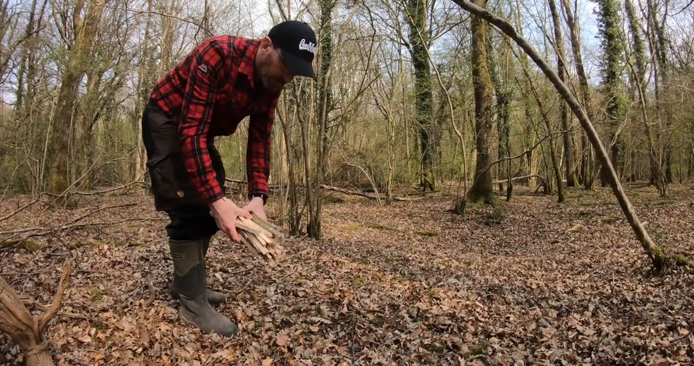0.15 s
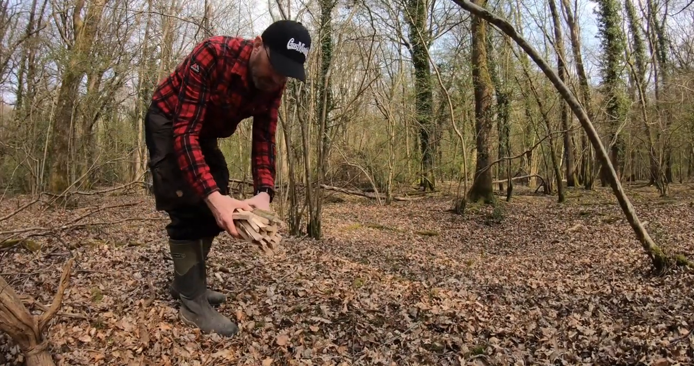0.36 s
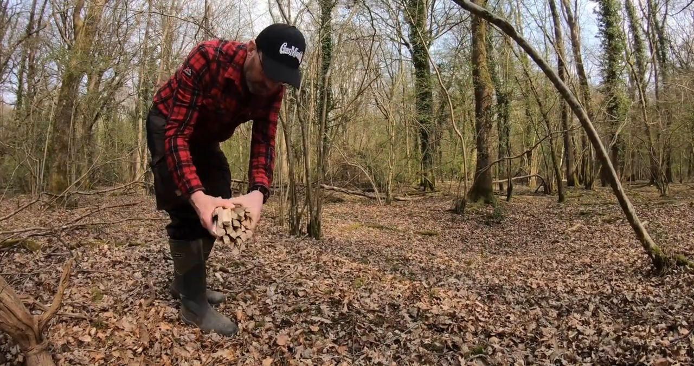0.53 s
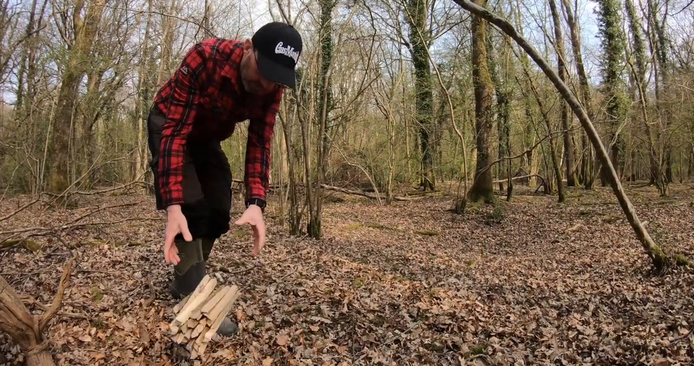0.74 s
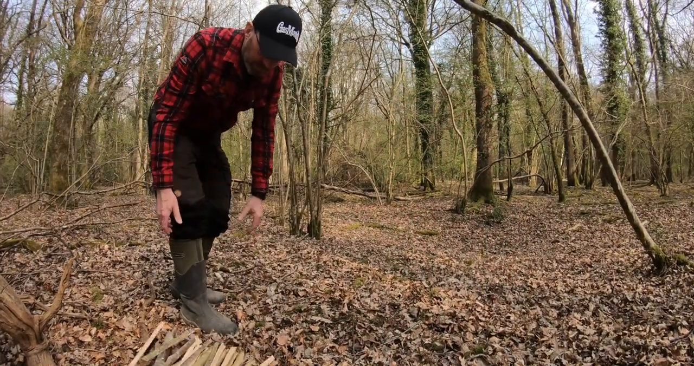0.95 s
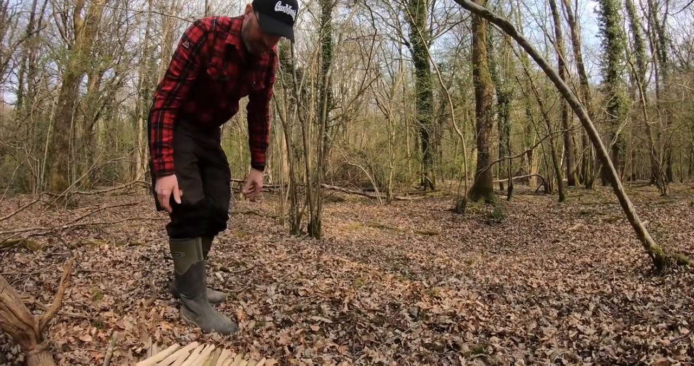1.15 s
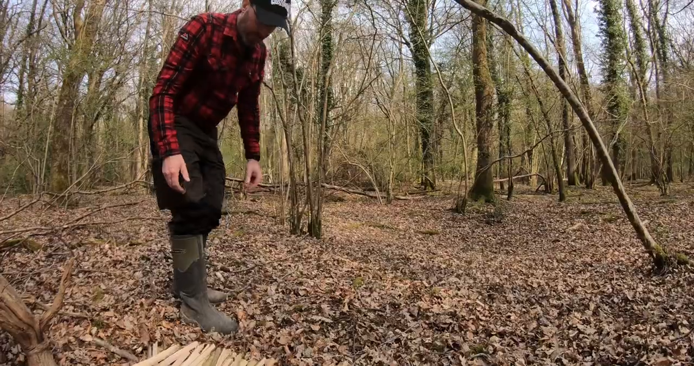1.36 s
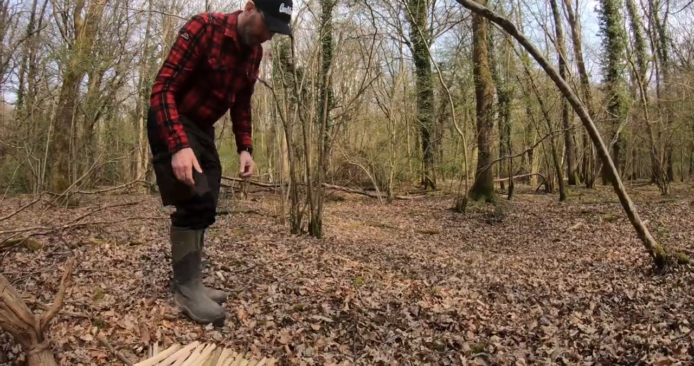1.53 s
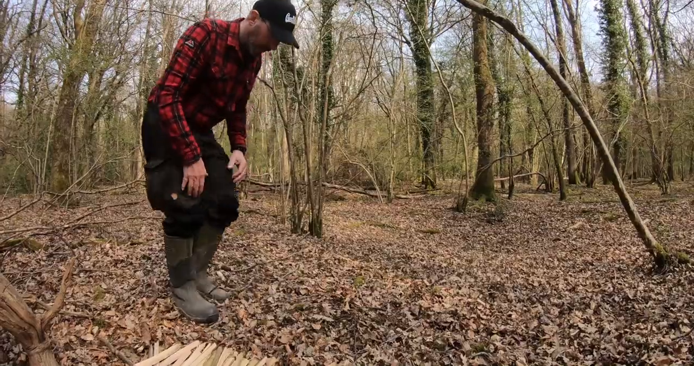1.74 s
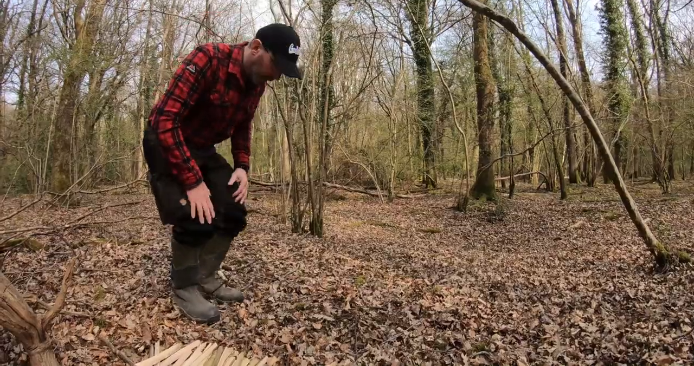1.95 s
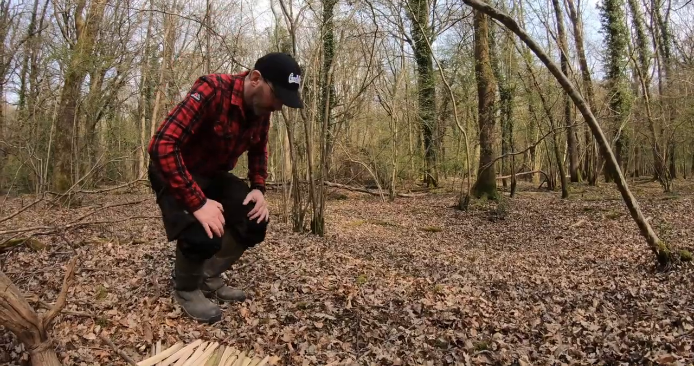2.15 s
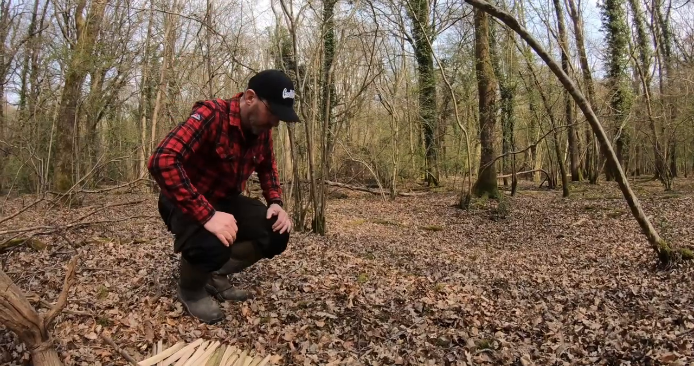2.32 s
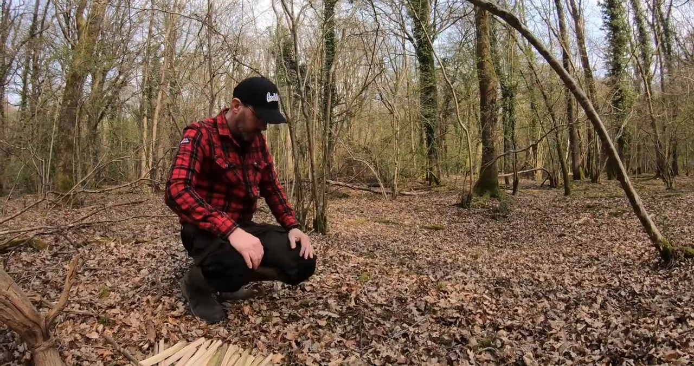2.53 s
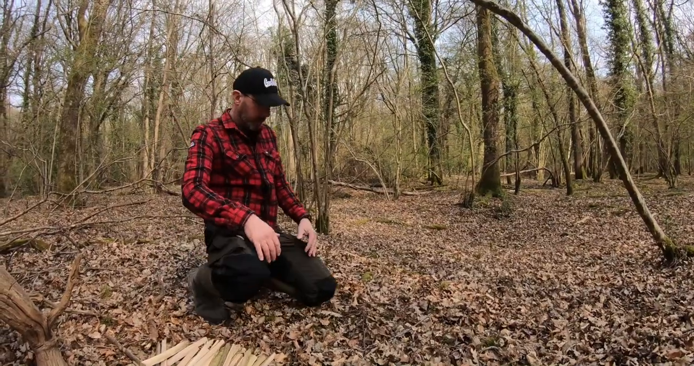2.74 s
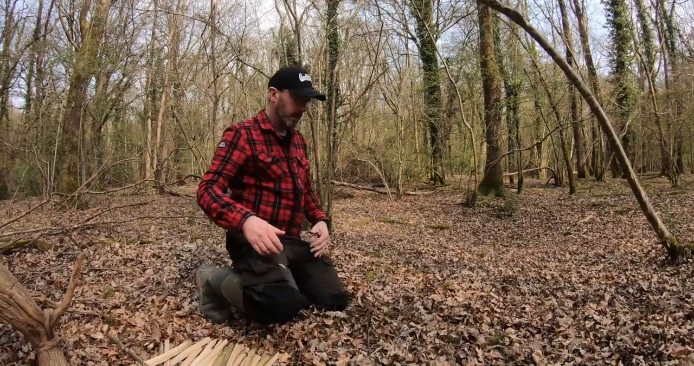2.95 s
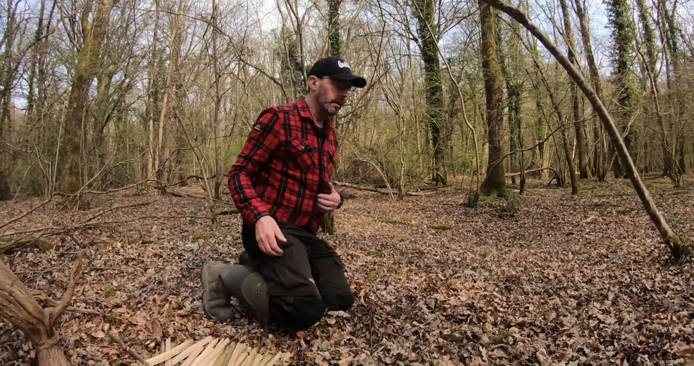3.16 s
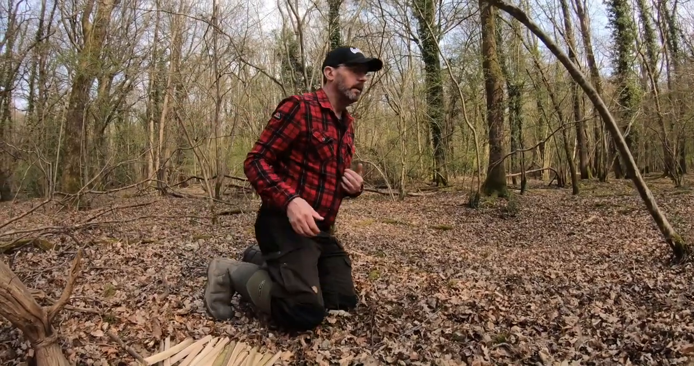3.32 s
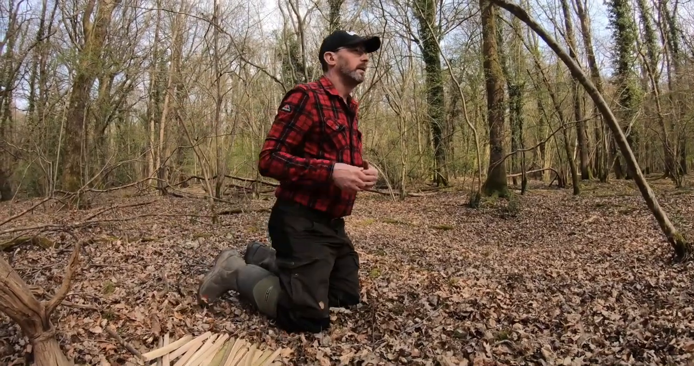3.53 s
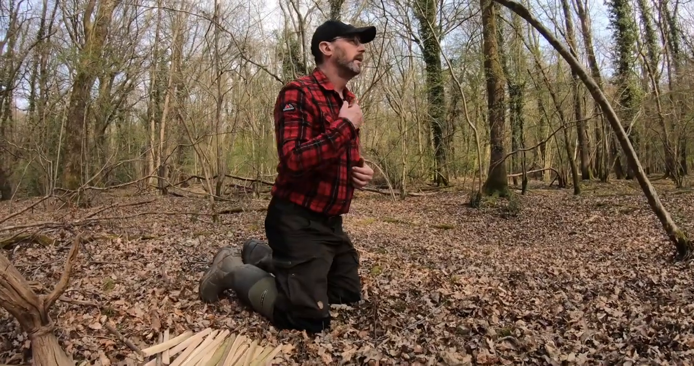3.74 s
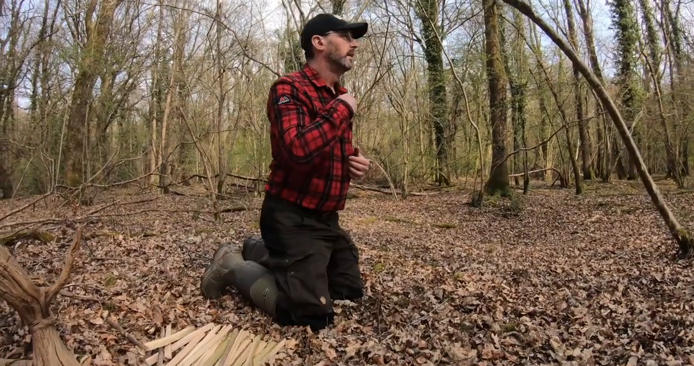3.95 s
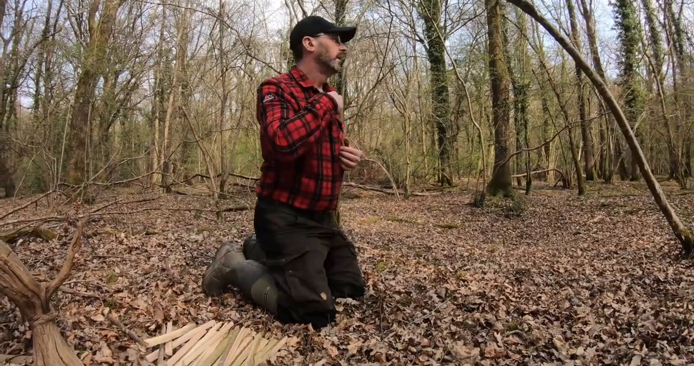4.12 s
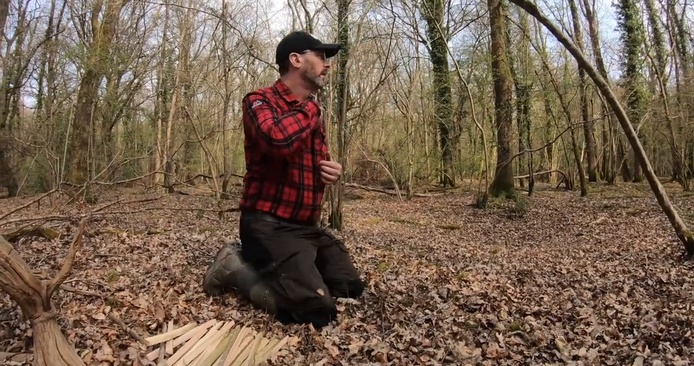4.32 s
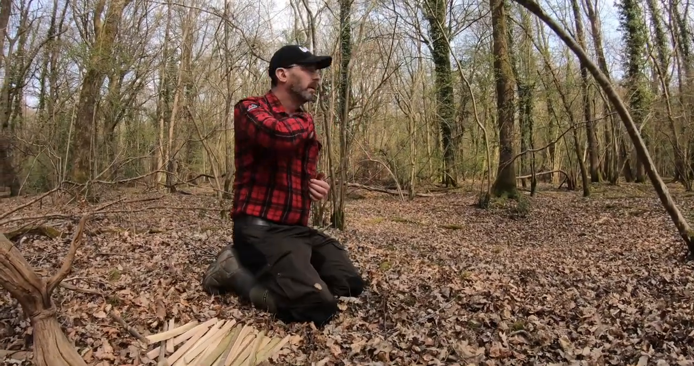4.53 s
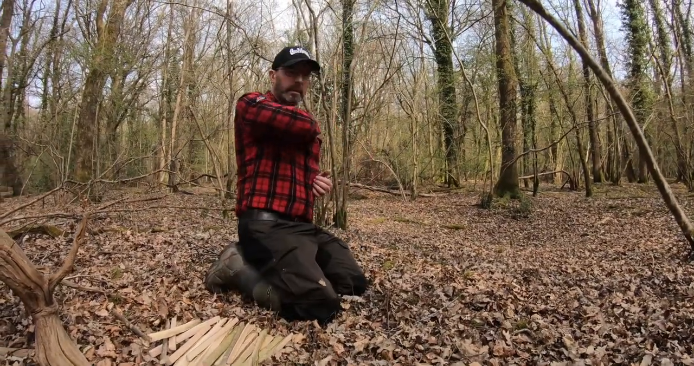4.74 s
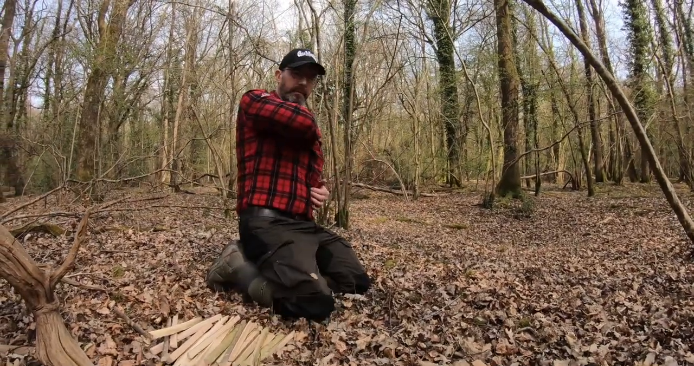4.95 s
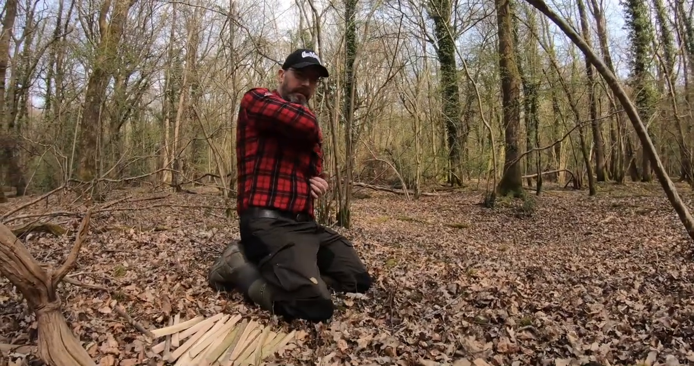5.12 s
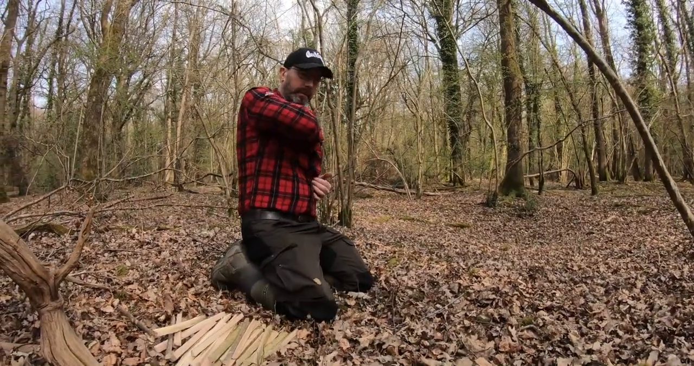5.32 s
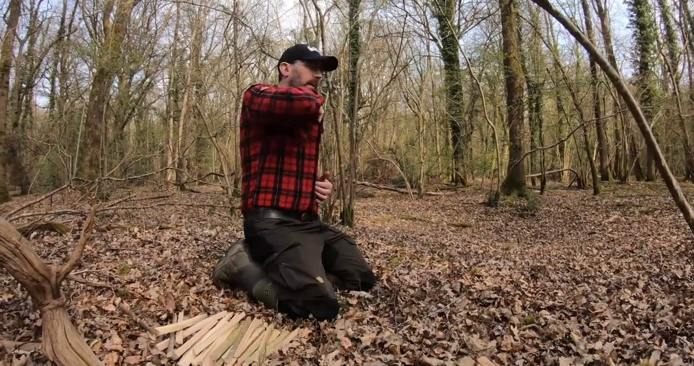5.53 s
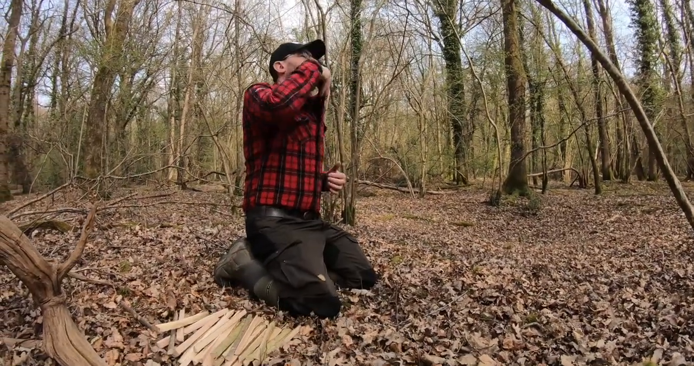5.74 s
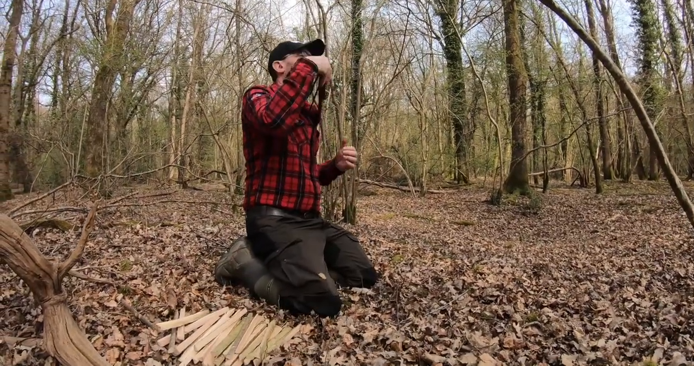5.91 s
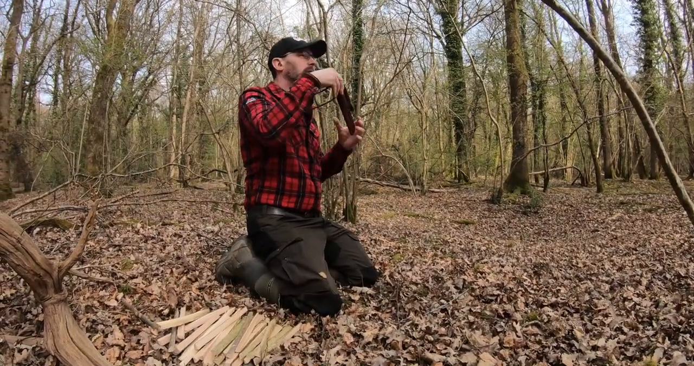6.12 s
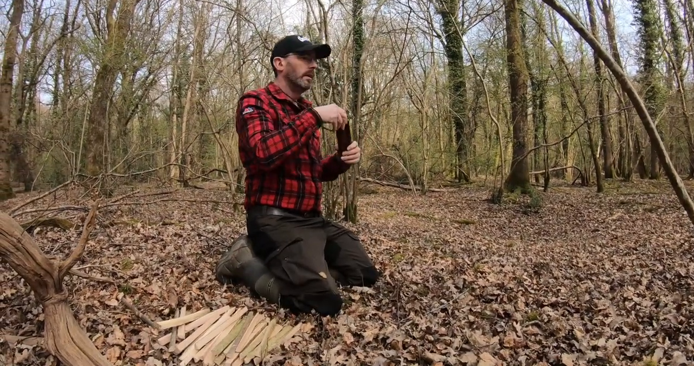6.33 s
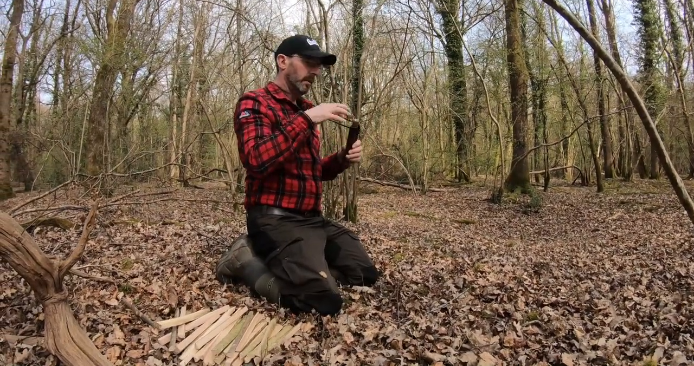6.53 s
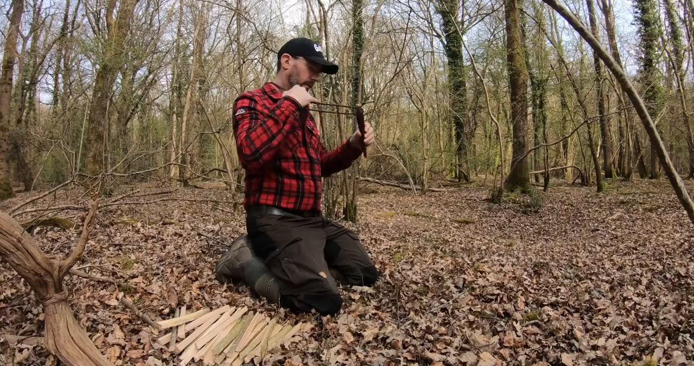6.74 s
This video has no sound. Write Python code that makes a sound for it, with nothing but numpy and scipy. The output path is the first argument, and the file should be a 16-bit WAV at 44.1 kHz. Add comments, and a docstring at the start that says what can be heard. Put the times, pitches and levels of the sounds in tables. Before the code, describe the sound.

A quiet outdoor woodland, heard close in stereo, with low gusts of wind buffeting the microphone and a soft airy wash throughout. At first dry leaves crackle lightly with small twig snaps, and a far bird trills from about 0.3 to 0.8 seconds. Around 0.95 a bundle of split sticks hits the leaves: a sharp, bright wooden clatter with crush and dull thud, rattling and toppling until 1.3. Steps crunch leaves strongly near 1.75, with a loud twig crack at 2.3 and another at 2.55. Kneeling brings brittle rustling around 2.95 and 3.6, rasping trousers, snaps near 3.8 and a last crack and soft thud at 4.5. From 4.8 to 5.3 clothing swishes finely. Then it is quiet: faint bird notes from 5.9, a clear cord tap at 6.35, smaller ticks, and a thin high hiss rising to the end near 6.9.

```python
"""Light wind buffets the microphone throughout: noise rumbling in gusts over a soft airy wash.
First leaves crackle underfoot (bursts of tiny fractures), twigs snap and a far bird trills (gliding sines).
Near 0.9 s a bundle of split sticks drops onto the leaves: ringing wood modes, a crush, rattles, dull thuds.
Someone then steps back, kneels and shuffles: more leaves and snaps, rasping fabric, a swish of clothing.
Late on come small cord taps, far bird notes and the thin rising hiss of cord running through fingers."""
import sys
import numpy as np
from scipy import signal
from scipy.fft import rfft, irfft, next_fast_len
from scipy.io import wavfile
from scipy.ndimage import uniform_filter1d, map_coordinates

SR = 44100
rng = np.random.default_rng(int(sys.argv[2]) if len(sys.argv) > 2 else 0)


def wav_record(signal):
    """Record a signal, one row per channel, as 16-bit PCM in the file named by sys.argv[1]."""
    frames = np.transpose(np.atleast_2d(signal))
    bounded = np.clip(frames, -1, 1)
    # unit amplitude maps onto the largest positive 16-bit level
    quanta = np.round(bounded * 32767).astype(np.int16)
    wavfile.write(sys.argv[1], SR, quanta)


N = 303143
TIME = np.arange(N) / SR
STEPS = TIME[::16]  # coarse times for the slow gains
TICKS_PER_S, TICKS_SPREAD_DB = 60, 2.8  # sparse brittle ticks in leaves and cloth


def amp(db):
    """Turns decibels into gain."""
    return 10 ** (np.asarray(db) / 20)


def unit(x):
    """Scales to rms 1."""
    return x / np.sqrt(np.mean(x ** 2) + 1e-20)


def colour(x, points):
    """Filters by a spectrum of (f/Hz, gain/dB) points, joined along log frequency."""
    size = next_fast_len(N + 4096)
    hz, db = np.transpose(points)
    log_hz = np.log(np.fft.rfftfreq(size, 1 / SR) + 1)
    gain = amp(np.interp(log_hz, np.log(hz + 1), db))
    return irfft(rfft(x, size) * gain, size)[..., :N]


def add(mix, s, sound):
    """Mixes a sound in at time s."""
    part = mix[max(round(s * SR), 0):][:len(sound)]
    part += sound[:len(part)]


def dying(t60, size=8192):
    """An exponential decay that falls 60 dB in t60 seconds."""
    return np.exp(-np.log(1000) * TIME[:size] / t60)


def band(x, hz, octaves):
    """A broad band-pass reaching the given octaves either side of hz."""
    edges = np.clip([hz / 2 ** octaves, hz * 2 ** octaves], 10, SR / 2 - 100)
    return signal.sosfilt(signal.butter(1, edges, "band", fs=SR, output="sos"), x)


def random_sizes(spread_db):
    """Signed sizes, exponentially spread in dB: a positive spread makes a few large, a negative a few small."""
    return amp(spread_db * np.minimum(rng.exponential(1, N), 4)) * rng.choice([-1, 1], N)


def clicks(per_s, spread_db):
    """Sparse impulses at random times and sizes."""
    return random_sizes(spread_db) * (rng.random(N) < per_s / SR)


def fractures(per_s, spread_db, t60, count=24):
    """Tiny fractures, each ringing one of a few scraps of material; per_s may follow a curve."""
    at = np.flatnonzero(rng.random(N) < per_s / SR)
    size = random_sizes(spread_db)[at]
    scraps = []
    for hz in np.geomspace(1000, 11000, count):
        burst = rng.standard_normal(384) * dying(t60, size=384)
        scraps.append(unit(band(burst, hz, .6)) * np.sqrt(hz))
    scraps = np.array(scraps)
    which = rng.integers(0, count, N)[at]
    # lay every scrap down at its own moment and sum the overlaps
    places = at[:, None] + np.arange(scraps.shape[1])
    grains = size[:, None] * scraps[which]
    return np.bincount(places.ravel(), grains.ravel(), N)[:N]


def steady(x, size=2205):
    """Holds the slow level near rms 1 over a window of size samples and keeps the grain."""
    return x / np.sqrt(abs(uniform_filter1d(x ** 2, size)) + 1e-9)


def crackle(spectrum, per_s, spread_db, t60, rub, size=4410):
    """Fractures over smooth rubbing noise, at an even slow level."""
    grains = steady(fractures(per_s, spread_db, t60), size=size)
    return steady(colour(grains + rub * rng.standard_normal(N), spectrum), size=size)


def swell(s, db, rise_s, fall_s, hold_s=0):
    """Gain of one movement: 20 dB per rise or fall time, level during the hold."""
    below = np.maximum(s - STEPS, 0) / rise_s + np.maximum(STEPS - s - hold_s, 0) / fall_s
    return amp(db - 20 * np.minimum(below, 10))


def swells(rows):
    """Gain of overlapping movements, summed in power."""
    power = sum(swell(*row) ** 2 for row in rows)
    return np.interp(TIME, STEPS, np.sqrt(power))


def weather(shared=0.8):
    """Turbulent gusts rumble partly independently at each port, over the soft wash of the wood."""
    # gusts reaching the microphone: [fullest from t/s, relative level/dB, hold/s]
    gusts = [(0.023, -45, 0.13), (0.306, -53, 0.32), (.78, -52, 0.12), (1.422, -49.5, 0.034),
             (1.704, -55.5, .12), (2.968, -50, .43), (4.112, -59, 0.0086), (4.4, -52, 0.046),
             (4.8, -48, 0.014), (5.43, -49.5, 0.14), (5.718, -47, 0.21), (6.2, -49, .03),
             (6.4, -50.5, 0.23), (6.78, -45, 0.1)]
    # low rumble of moving air at the ports: [f/Hz, gain/dB]
    wind_colour = [(8.8, -25), (15, -3), (37, -0.5), (65, -1), (135, -15), (166, -15.5), (231, -34),
                   (304, -30), (400, -31), (520, -63), (880, -120)]
    # soft wash of the wood: [f/Hz, gain/dB]
    wash_colour = [(100, 9), (250, 4.5), (470, -11.5), (800, -0.5), (1200, -12.5), (2200, -14), (3500, -11),
                   (6000, -19), (10000, -28), (15000, -42)]
    rise_s, fall_s, breeze_db = .12, 0.24, -63.5  # the light breeze carries on between gusts
    rumble = colour(rng.standard_normal((2, N)) + shared * rng.standard_normal(N), wind_colour)
    wash = colour(rng.standard_normal((2, N)) + 0.72 * rng.standard_normal(N), wash_colour)
    gusting = swells([(s, db, rise_s, fall_s, hold) for s, db, hold in gusts])
    wind = np.hypot(amp(breeze_db), gusting)
    return amp(-1.5) * wind * steady(rumble, size=8820) + amp(-62) * unit(wash)


def leaves(busy_per_s=3500, busy_db=-40, crowding=.75):
    """Harder stirring breaks more leaves at once; the pressed layer beneath crunches lower."""
    # pushes by feet, tumbling sticks and knees:
    # [fullest at t/s, relative level/dB, rise/s, fall/s, low crunch relative to the stir/dB]
    pushes = [(.06, -52, 0.61, 0.27, -9.5), (.66, -64.5, 0.38, 0.37, -5.5), (.98, -40, 0.031, 0.27, -15.5),
              (1.149, -36.5, .13, 0.14, -20), (1.26, -40, 0.12, 0.074, -15.5), (1.6, -46, 0.4, 0.3, -10.5),
              (1.745, -37, 0.19, 0.06, -6.5), (1.87, -50, 0.14, 0.17, -4.5), (2.009, -46.5, 0.21, 0.2, -9),
              (2.33, -52, 0.28, 0.36, -7.5), (2.74, -51.5, 1, 0.58, -9.5), (2.958, -42.5, .08, .32, -13.5),
              (3.28, -51, 1, 1.1, -14.5), (3.59, -37.5, .22, 0.28, -13.5), (3.728, -42.5, 0.19, 0.13, -9.5),
              (3.85, -51, 0.37, 0.94, -9), (4.55, -48.5, 0.55, 0.2, -5.5)]
    # crackle of dry leaves: [f/Hz, gain/dB]
    leaf_colour = [(100, -54.5), (400, -13), (750, -3.5), (1100, -2.5), (1500, -2), (2100, -2.5),
                   (3000, -1), (4200, -1.5), (5500, -8), (7000, -12), (10000, -28.5)]
    # fine fizz above the crackle: [f/Hz, gain/dB]
    fizz_colour = [(1000, -61), (3500, -22.5), (5500, -2.5), (6300, -4.5), (7900, -10.5), (9100, -3.5),
                   (10000, -5), (11000, -11), (13500, -8), (15000, -24)]
    # low crunch of the pressed layer: [f/Hz, gain/dB]
    crunch_colour = [(30, -40.5), (90, -13), (160, -1), (280, 9), (480, -4), (780, -8), (1100, -24.5),
                     (2000, -29.5)]
    fizz_db, fizz_follows = -5.5, 1  # fizz against crackle in a busy push; dB gained per dB of crackle
    stir = swells([row[:4] for row in pushes])
    weight = swells([(s, db + low_db, rise, fall) for s, db, rise, fall, low_db in pushes])
    busy = stir / amp(busy_db)
    per_s = busy_per_s * busy ** crowding
    top = crackle(leaf_colour, per_s=per_s, spread_db=3.8, t60=0.0093, rub=1.0)
    fizz = crackle(fizz_colour, per_s=per_s, spread_db=-2.5, t60=0.0088, rub=1.0)
    # now and then a whole brittle leaf gives way, standing out most when the rest is quiet
    ticks = fractures(TICKS_PER_S, TICKS_SPREAD_DB, t60=0.011)
    exposed = amp(-8.5) / (1 + busy)
    top = top + exposed * unit(colour(ticks, leaf_colour))
    fizz = fizz + exposed * unit(colour(ticks, fizz_colour))
    under = steady(colour(clicks(per_s=1300, spread_db=5.0), crunch_colour))
    fizz_gain = amp(busy_db + fizz_db) * busy ** fizz_follows
    return amp(-0.3) * (stir * top + fizz_gain * fizz) + amp(1.54) * weight * under


def bounce(x):
    """The direct sound and its slightly later reflection off the ground comb against each other."""
    # lag of the reflection as the body moves: [t/s, lag/s]
    ground_lag = [(0, .0014), (1.75, .0014), (2.6, .00146), (3.8, .00146), (4.9, .00167), (6.87, .00167)]
    # what the leaf litter reflects: [f/Hz, gain/dB]
    litter = [(2200, -9.5), (3500, -15), (6000, -24)]
    lag = np.interp(TIME, *np.transpose(ground_lag))
    late = map_coordinates(x, [np.arange(N) - lag * SR], order=3)
    return 0.9 * (x + colour(late, litter))


def cracks(rows, octaves, first):
    """A sudden release (one strong first sample) and a noise burst that dies in milliseconds."""
    out = np.zeros(N)
    for s, db, hz, t60 in rows:
        burst = rng.standard_normal(8192) * dying(t60)
        burst[0] += first
        burst = band(band(burst, hz, octaves), hz, octaves)
        add(out, s, amp(db) * burst / abs(burst).max())
    return out


def snaps():
    """Twigs and leaf stalks break, releasing their tension in short splintering bursts."""
    # breaks: [t/s, peak level/dB, centre f/Hz, t60/s]
    breaks = [(.053, -29.5, 796, 0.016), (.088, -34.5, 3020, 0.017), (.206, -37.5, 3500, 0.036),
              (.334, -41.5, 5160, 0.0082), (.524, -44, 4430, 0.017), (1.726, -35, 3530, 0.0079),
              (1.75, -40, 1800, .015), (1.8705, -27, 2500, 0.012), (1.896, -37.5, 900, 0.015),
              (1.9705, -28, 1360, 0.015), (2.029, -33, 570, 0.042), (2.338, -16.5, 1810, 0.014),
              (2.5575, -22, 2540, 0.014), (2.8145, -35, 2300, 0.021), (2.921, -28.5, 3960, 0.036),
              (2.951, -27, 2960, 0.059), (3.8015, -25.5, 2600, 0.023), (3.818, -25.5, 3200, 0.01),
              (3.8315, -25.5, 1610, 0.013), (3.853, -29.5, 3200, 0.0077), (3.9465, -33, 1260, 0.0082),
              (3.967, -35, 3000, .014), (4.315, -40.5, 2560, 0.023), (4.394, -39.5, 586, 0.034),
              (4.4775, -22.5, 3220, 0.029)]
    return cracks(breaks, octaves=1.12, first=5.2)


def trees(x, t60):
    """Sparse random echoes from trunks, different for each ear."""
    echoes = rng.standard_normal((2, SR)) * (rng.random((2, SR)) < 1500 / SR) * dying(t60, size=SR)
    echoes[:, :400] = 0  # no echo in the first 9 ms
    return signal.fftconvolve(x[None], echoes / np.linalg.norm(echoes[0]), axes=1)[:, :N]


def whistle(length, start_hz, end_hz, waver):
    """One gliding bird note of rms 1: a sine whose pitch eases to its end and wavers."""
    u = np.linspace(0, 1, int(length * SR))
    drift = unit(uniform_filter1d(rng.standard_normal(SR), size=90))[:len(u)]
    hz = (start_hz + (end_hz - start_hz) * np.sin(np.pi / 2 * u)) * (1 + waver * drift)
    return unit(np.sin(np.pi * u) * np.sin(2 * np.pi * np.cumsum(hz) / SR))


def birds():
    """A trill, then single whistled notes; the larger a note's echo share, the more the trees smear it."""
    # far trill: first note t/s, end t/s, notes per second
    trill_times = (.27, .78, 15)
    # single notes: [t/s, length/s, level/dB, start f/Hz, end f/Hz, share of echo 0-1]
    notes = [(0.887, 0.059, -55, 3750, 4040, 0.8), (1.365, 0.075, -57, 3900, 3810, 0.8),
             (1.478, 0.053, -57, 4000, 3960, 0.4), (5.936, 0.088, -73, 6730, 6060, 0.97),
             (6.028, 0.16, -74.5, 3260, 3155, 0.85), (6.187, 0.11, -78.5, 4630, 4620, 0.6),
             (6.199, 0.079, -69, 1150, 1335, 0.98), (6.408, 0.16, -69, 3080, 3460, 0.85),
             (6.522, 0.11, -73.5, 3240, 3150, 0.7), (6.636, 0.17, -74, 4630, 4610, 0.9)]
    trill_db, trill_hz = -66.5, (2900, 4400)  # each trill note glides up, before random offsets
    direct, trill, far = np.zeros((3, N))
    first, end, per_s = trill_times
    for s in np.arange(first, end, 1 / per_s):
        late, louder, higher = rng.standard_normal(3) * [.006, 1, .03]  # s, dB, share of pitch
        note = whistle(.05, *np.multiply(trill_hz, 1 + higher), waver=.05)
        add(trill, s + late, amp(trill_db + louder) * note)
    for s, length, db, start_hz, end_hz, echo in notes:
        note = amp(db) * whistle(length, start_hz, end_hz, waver=0.0022 + .012 * echo ** 8)
        add(direct, s, np.sqrt(1 - echo ** 2) * note)
        add(far, s, echo * note)
    return direct + .3 * trill + trees(trill, t60=.25) + trees(far, t60=.55)


def knock(hz):
    """One blow on a stick: the wood modes near hz ring along with a short contact crack."""
    # modes of the sticks: [f/Hz, level/dB, t60/s]
    wood_modes = [(724, -8, 0.036), (975, -9.5, 0.037), (1212, -14.5, 0.11), (1342, -12, 0.08),
                  (1566, -5, 0.053), (2225, 1, .05), (2425, -9.5, 0.11), (2620, -14.5, 0.05),
                  (2960, -10, 0.031), (3170, -0.5, .038), (3300, -10, .04), (3550, -14, .05),
                  (3510, -9, .05), (4120, -6.5, 0.026), (4770, -11, .05), (4880, -12, 0.043),
                  (5050, -7.5, 0.034), (5500, -12.5, .04), (6550, -20, .04)]
    reach_octaves, crack_strength, crack_t60 = .36, .65, .011  # crack is relative to the ring
    ring = 0
    for f, db, t60 in wood_modes:
        weight = amp(db) / (1 + (np.log2(f / hz) / reach_octaves) ** 4)
        ring = ring + weight * dying(t60) * np.sin(2 * np.pi * (f * TIME[:8192] + rng.random()))
    contact = band(rng.standard_normal(8192) * dying(crack_t60), hz, 0.53)
    blow = ring / abs(ring).max() + crack_strength * contact / abs(contact).max()
    blow = blow * (1 - dying(0.00059))  # softens the onset
    return blow / abs(blow).max()


def sticks():
    """The bundle crushes the leaves, its sticks collide, and the pile rattles as it lands and topples."""
    # leaves crushed under the bundle: [f/Hz, gain/dB]
    crush_colour = [(40, -54.5), (100, -18.5), (300, -10.5), (480, -8.5), (800, 0.5), (1100, -2),
                    (1500, -2.5), (1800, -1), (3700, 3), (4400, 3.5), (6200, -2.5), (8300, -15), (9600, -7),
                    (15000, -28)]
    # stick on stick: [t/s, peak level/dB, pitch that rings most f/Hz]
    knocks = [(.9435, -16.5, 4920), (.9492, -11, 3300), (.9538, -6.5, 3020), (.958, -14.5, 2270),
              (.9805, -28.5, 4160), (1.005, -28, 1635), (1.032, -43, 2560), (1.0608, -32.5, 1336),
              (1.0635, -32.5, 2205), (1.088, -35, 2330), (1.1107, -21, 1710), (1.117, -29.5, 4540),
              (1.1365, -33, 1660), (1.147, -35.5, 864), (1.151, -22, 2860), (1.1554, -26, 1610),
              (1.1678, -26.5, 1230), (1.184, -31, 2140), (1.196, -29, 1000), (1.226, -36.5, 890),
              (1.252, -41, 1413), (1.275, -33, 4900)]
    # rattle of the pile landing, then toppling: [fullest at t/s, level/dB, rise/s, fall/s, hold/s]
    settle = [(.957, -31, .03, .035, .003), (1.13, -39.5, 0.39, .12, .07)]
    landing_s = .92  # no rattle before this
    # crush: fullest at s, level dB, rise s, fall s, hold s
    crush_gain = swells([(.941, -21, .017, 0.018, 0.014)])
    out = crush_gain * crackle(crush_colour, per_s=11000, spread_db=-1.5, t60=.003, rub=0.82, size=441)
    for s, db, hz in knocks:
        add(out, s, amp(db) * knock(hz))
    rattle = np.zeros(N)
    for hz in np.geomspace(900, 5500, 8):
        hits = clicks(per_s=30, spread_db=1.5)
        rattle += signal.oaconvolve(hits, unit(knock(hz)))[:N] * hz ** -.25
    return out + (TIME > landing_s) * swells(settle) * steady(rattle)


def soil():
    """The soft ground answers weight with a few dull cycles of a damped sine."""
    # thuds: [t/s, starting level/dB, f/Hz, t60/s]
    thuds = [(.944, -30.5, 276, 0.051), (.953, -37.5, 151, 0.098), (0.959, -37, 88.7, 0.18),
             (1.752, -55.5, 198, .05), (1.8966, -31, 344, 0.0098), (2.03, -29.5, 415, 0.012),
             (2.339, -27.5, 294, 0.0195), (3.574, -30, 273, 0.046), (4.478, -36, 310, 0.056)]
    out = np.zeros(N)
    for s, db, hz, t60 in thuds:
        add(out, s, amp(db) * dying(t60) * np.sin(2 * np.pi * hz * TIME[:8192]))
    return out


def chafing():
    """Stiff trousers and boots rub during the kneel, rasping in a few broad resonances."""
    # the rub: fullest at t/s, level/dB, rise/s, fall/s, hold/s
    rub_swell = (3, -56.5, 0.8, 0.76, 0.81)
    # resonances of the stiff fabric: [f/Hz, gain/dB]
    chafe_colour = [(1200, -24.5), (1800, -14.5), (2130, 7.5), (2550, -14), (3120, 3), (3550, -6.5),
                    (4000, -5.5), (5500, -19.5), (12000, -39)]
    return swells([rub_swell]) * crackle(chafe_colour, per_s=830, spread_db=3, t60=.009, rub=0.33)


def clothing(busy_per_s=6000, busy_db=-42):
    """Fibres catch and slip: a fine swish when fast, single ticks when slow."""
    # arm and cord sliding over the shirt: [fullest at t/s, relative level/dB, rise/s, fall/s, hold/s]
    slides = [(4.98, -42.5, 0.23, 0.19, .27), (5.6, -65, 0.69, 0.42, 0.14), (6.37, -59.5, 0.11, .08, .01),
              (6.6, -68.5, 0.28, 0.113, .01), (6.86, -65, 0.11, .1, .01)]
    # swish of the cloth: [f/Hz, gain/dB]
    cloth_colour = [(100, -13.5), (250, 6), (430, -7), (650, -4.5), (1050, -5), (2400, -4.5), (3600, -3),
                    (5700, -6), (7400, -13), (9200, -9), (10200, -9.5), (11000, -19), (14000, -13.5),
                    (15000, -32)]
    slide = swells(slides)
    busy = slide / amp(busy_db)
    swish = crackle(cloth_colour, per_s=busy_per_s * busy, spread_db=4.0, t60=0.0022, rub=1.0)
    catches = unit(colour(fractures(TICKS_PER_S, TICKS_SPREAD_DB, t60=0.013), cloth_colour))
    exposed = .6 / (1 + 8 * busy)  # ticks stand out when the slide is slow
    return amp(0.37) * slide * (swish + exposed * catches)


def cord_taps():
    """The cord and what hangs on it tap lightly: tiny bursts in a broad treble band."""
    # taps: [t/s, peak level/dB, centre f/Hz, t60/s]
    tap_rows = [(5.851, -48, 3000, 0.027), (6.217, -45, 3740, .02), (6.333, -42, 3560, 0.031),
                (6.3515, -28.5, 3080, 0.016), (6.407, -40.5, 3250, 0.022), (6.56, -38, 3950, 0.01),
                (6.798, -50, 4090, 0.027), (6.836, -40, 3320, 0.03)]
    return cracks(tap_rows, octaves=1.0, first=4.8)


def cord_hiss():
    """The cord runs through the fingers: dense tiny clicks blur into a thin, bright hiss."""
    # the run: fullest at t/s, level/dB, rise/s, fall/s, hold/s
    run_swell = (7, -74.5, 0.6, .3, 0.45)
    return swells([run_swell]) * unit(band(clicks(per_s=1500, spread_db=4.5), 9500, .25))


def ports(x, size=330):
    """A randomly wandering bearing and the spacing of the ports keep the two channels apart."""
    # side from the spread of sources: [f/Hz, gain/dB]
    width = [(100, -19.5), (700, -7), (1300, -6), (2400, -13.5), (4400, -45), (6200, -5.5), (8200, -3.5),
             (15000, -7.5)]
    # side from the port spacing: [f/Hz, gain/dB]
    skew = [(1300, -21), (4400, -36.5), (6200, -19.5), (8200, -1.5), (10500, -9), (15000, -10)]
    # left minus right: [f/Hz, difference/dB]
    lean = [(200, -0.17), (700, 0.86), (1300, -2), (2400, -.8), (4400, 0), (8100, -3), (15000, 0.28)]
    bearing = unit(uniform_filter1d(uniform_filter1d(rng.standard_normal(N), size), size))
    side = colour(x * bearing, width)
    # the spaced ports hear the treble out of step: a quarter-cycle shifted copy
    side += colour(signal.hilbert(x, next_fast_len(N))[:N].imag, skew)
    left = colour(x + side, [(hz, db / 2) for hz, db in lean])
    right = colour(x - side, [(hz, -db / 2) for hz, db in lean])
    return np.array([left, right])


def scene():
    """Everything on the ground, its faint echo, and the wood around."""
    near = bounce(leaves() + clothing()) + snaps() + sticks() + soil()
    near += chafing() + cord_taps() + cord_hiss()
    return weather() + ports(near) + amp(-28.5) * trees(near, t60=0.43) + birds()


def record(dry):
    """The microphone's soft top, then a steep band limit at 15 kHz."""
    # roll-off in the top treble: [f/Hz, gain/dB]
    mic_colour = [(10000, 0.5), (12000, -2), (15000, -10)]
    edge = signal.firwin(255, 15000, window=("kaiser", 9), fs=SR)
    return signal.oaconvolve(colour(dry, mic_colour), edge[None], "same")


dry = scene()
out = record(dry)
wav_record(out)
```